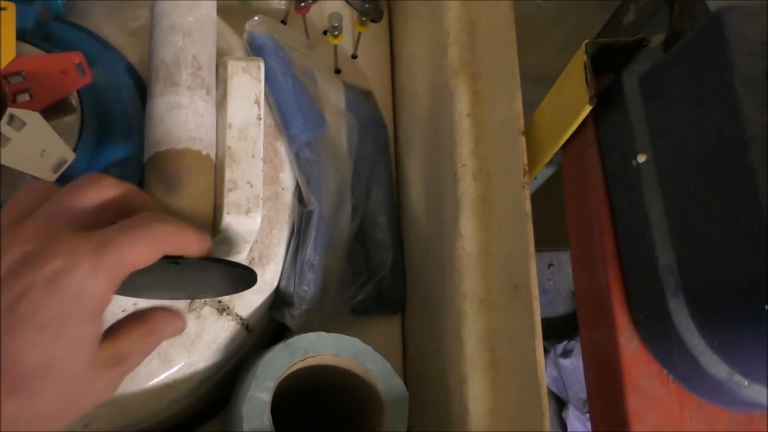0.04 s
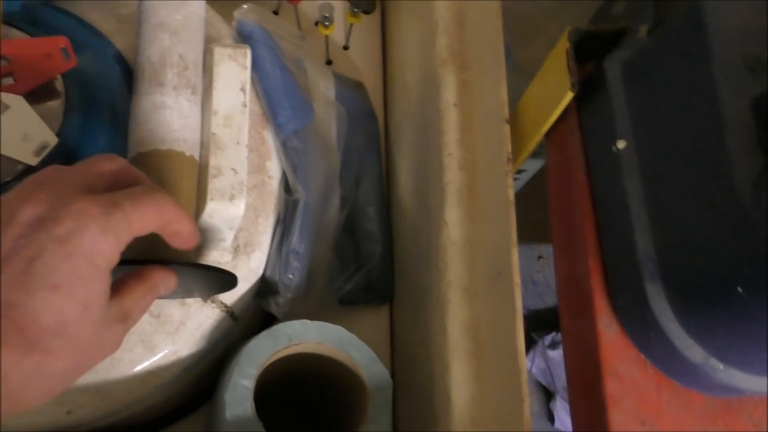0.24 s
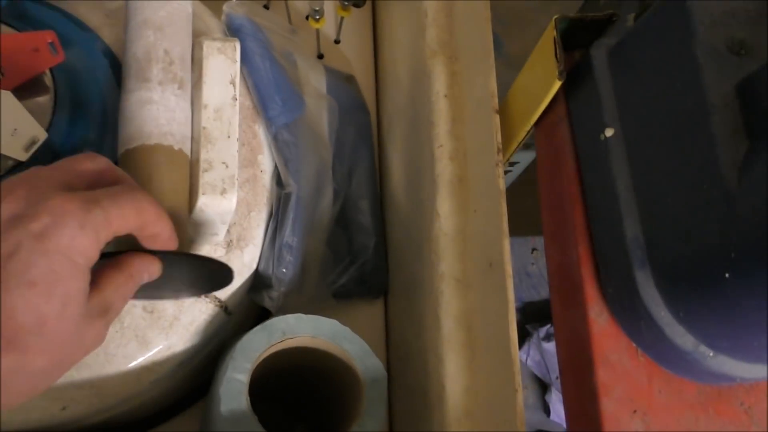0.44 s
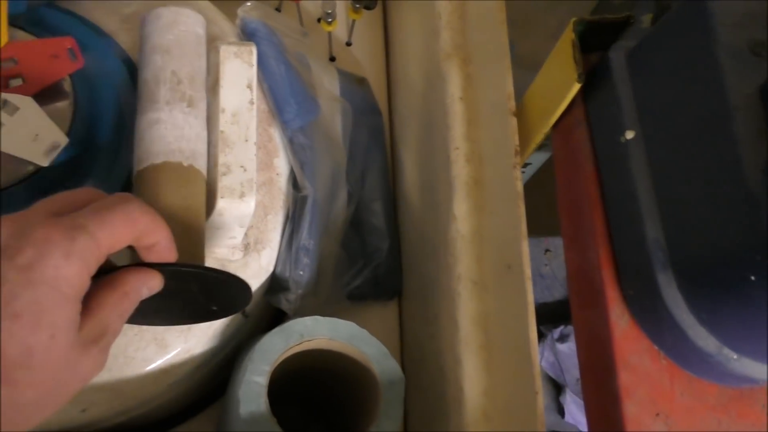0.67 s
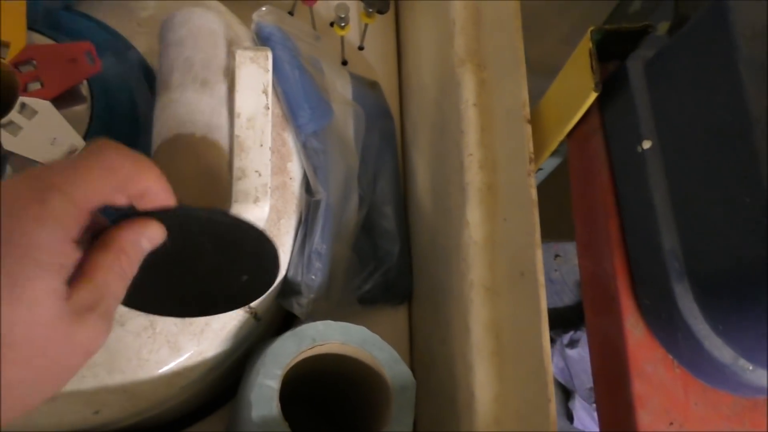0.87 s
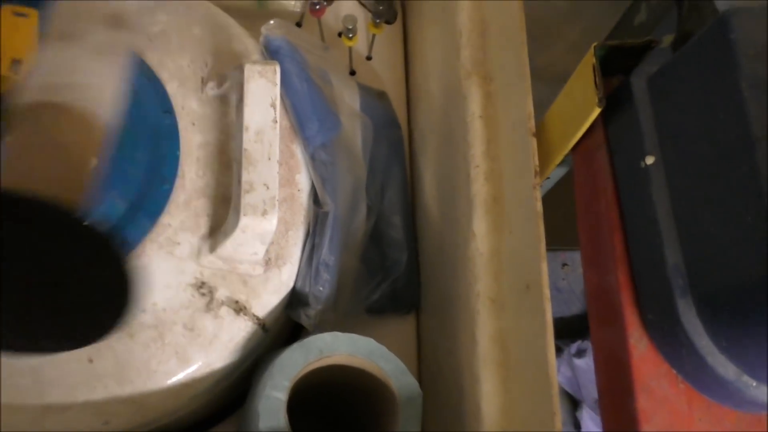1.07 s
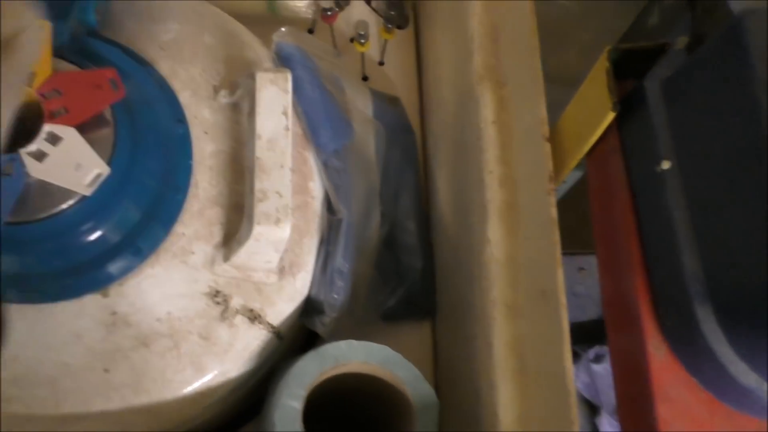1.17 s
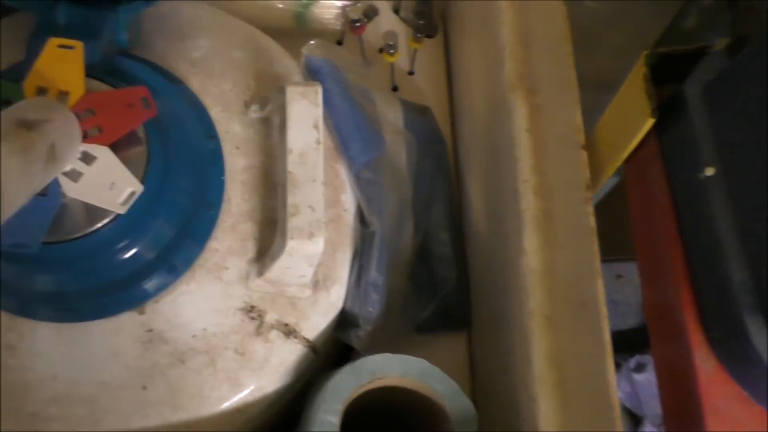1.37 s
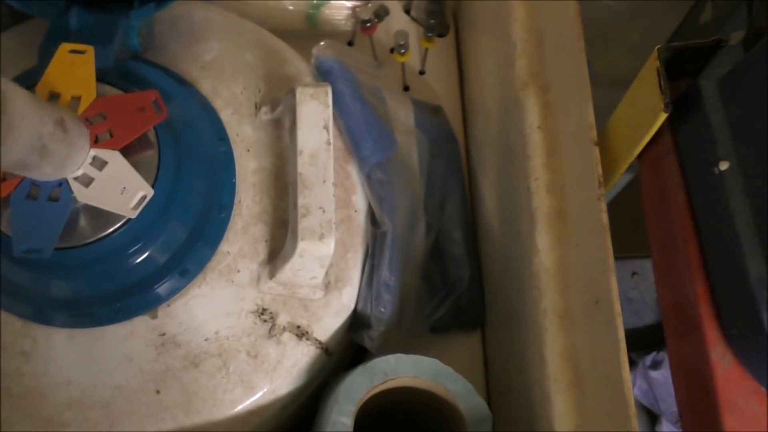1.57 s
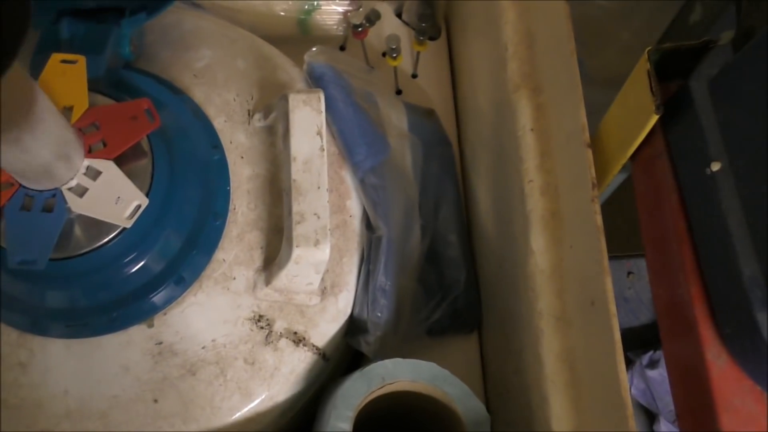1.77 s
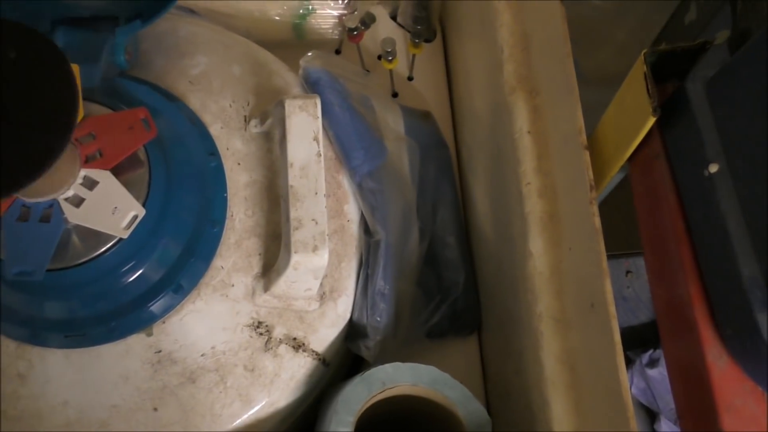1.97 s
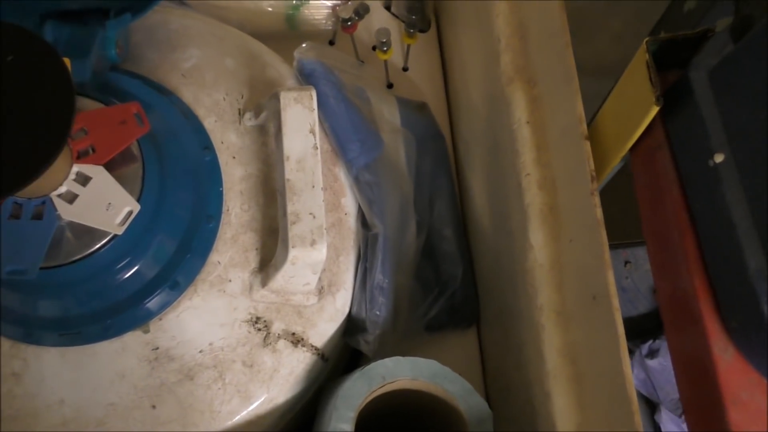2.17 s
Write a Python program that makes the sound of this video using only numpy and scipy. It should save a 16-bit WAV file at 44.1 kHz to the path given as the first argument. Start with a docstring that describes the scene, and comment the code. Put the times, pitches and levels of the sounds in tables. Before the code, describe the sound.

Close to the microphone in a small shed, a plug ticks and skims over a metal flask, clatters against it, pauses, bumps into the neck and grinds down in rough strokes, ending with a loud, squeaky rub.

```python
"""A plug is handled on top of a metal flask in a shed, close to the microphone.
It clicks, slides and knocks on the flask, bumps into the neck, then goes down in three rubbing strokes.
Contacts are struck decaying modes and noise bursts; rubbing is random grains through resonant filters.
The last stroke is loudest and nearly squeaks. Near reflections, a shed tail and quiet air surround it."""
import sys
import numpy as np
from scipy import signal
from scipy.fft import rfft, irfft
from scipy.io import wavfile

SR = 44100
rng = np.random.default_rng(int(sys.argv[2]) if len(sys.argv) > 2 else 0)


def master(y):
    """Save y as 16-bit WAV."""
    cut = np.clip(np.atleast_2d(y).T, -1, 1)
    pcm = np.round(cut * 32767)  # scale
    wavfile.write(sys.argv[1], SR, pcm.astype(np.int16))


N = 97725  # samples

# bright tick of a hard contact [pitch_hz, level_db]
TICK = [(800, -36), (3000, 10), (6000, -9), (9000, 7.5), (13000, -3), (16000, -9)]
# dry rasp of plug on metal [pitch_hz, level_db]
RASP = [(150, -9), (700, -10.5), (1600, -0.5), (2300, 0), (3500, -10.5), (5000, -18), (16000, -35)]
# airy top of the rubbing [pitch_hz, level_db]
HISS = [(500, -30), (2500, -15), (5000, -1), (7200, -2), (9800, 0), (13000, -2.5), (16000, -5.5)]
# resonances on that hiss [pitch_hz, width_hz, above_db]
HISS_PEAKS = [(5380, 43, 1.2), (9500, 290, 2.5)]
STRIKE_S, TICK_T60 = 0.0011, 0.026  # rise of a contact; decay of its tick (s)


def amp(db):
    """Decibels to gain."""
    return 10 ** (np.asarray(db) / 20)


def unit(x):
    """Scales to rms 1."""
    return x / np.sqrt(np.mean(x ** 2) + 1e-20)


def read(points, hz):
    """Reads a table on a log-frequency axis."""
    f, value = np.transpose(points)
    return np.interp(np.log(hz + 1), np.log(f), value)


def levels(curves, column):
    """Summed gain over time from one dB column of each movement, -120 dB outside it."""
    t = np.arange(N) / SR
    total = np.zeros(N)
    for curve in curves:
        points = np.array(curve)
        total += amp(np.interp(t, points[:, 0], points[:, column], left=-120, right=-120))
    return total


def since(start):
    """Seconds since a moment, zero before it."""
    return np.maximum(np.arange(N) / SR - start, 0)


def hump(start, length):
    """Half-sine swell and fall."""
    return np.sin(np.pi * np.minimum(since(start) / length, 1))


def colour(x, shape, peaks=(), size=8192):
    """Causal filter of unit energy: a broad shape with resonances on it."""
    hz = np.fft.rfftfreq(size, 1 / SR)
    power = 1 + sum((amp(db) ** 2 - 1) / (1 + (2 * (hz - f) / w) ** 2) for f, w, db in peaks)
    log_gain = np.log(amp(read(shape, hz))) + np.log(np.maximum(power, 1e-2)) / 2
    # folding the cepstrum gives minimum phase
    cepstrum = irfft(log_gain)
    cepstrum[1:size // 2] *= 2
    cepstrum[size // 2 + 1:] = 0
    taps = irfft(np.exp(rfft(cepstrum)))
    return signal.fftconvolve(x, taps / np.linalg.norm(taps))[:N]


def tilt(x, points):
    """Applies a gain curve over frequency."""
    gain = amp(read(points, np.fft.rfftfreq(2 * N, 1 / SR)))
    return irfft(rfft(x, 2 * N) * gain)[:N]


def wander(seconds):
    """Smooth chance of rms 1."""
    window = np.hanning(int(2 * seconds * SR) + 3)
    return unit(signal.fftconvolve(rng.standard_normal(N), window, "same"))


def friction(spread_db, clump_db, per_s=7000):
    """Tiny slips of uneven size that come in clumps."""
    size = amp(spread_db * np.minimum(rng.exponential(1, N), 4))
    slips = rng.choice([-1, 1], N) * (rng.random(N) < per_s / SR)
    return unit(size * slips * amp(clump_db * wander(0.0033)))


def burst(start, db, rise, t60):
    """Envelope of one contact: linear rise on an exponential decay."""
    t = since(start)
    return np.minimum(t / rise, 1) * amp(db) * np.exp(-np.log(1000) * t / t60)


def ring(start, db, modes):
    """Decaying modes struck at one moment."""
    t = since(start)
    norm = np.sqrt(sum(amp(m[1]) ** 2 for m in modes) / 2)
    out = np.zeros(N)
    for k, (f, mode_db, t60) in enumerate(modes):
        sign = (-1) ** k
        out += sign * burst(start, db + mode_db, STRIKE_S, t60) * np.sin(2 * np.pi * f * t)
    return out / norm


def air():
    """Quiet background of the shed: wide coloured noise with a slightly fluttering level."""
    # background colour [pitch_hz, level_db]
    air_tone = [(25, -1), (60, 2), (120, 4), (270, 9.5), (380, 5.5), (550, -2), (750, -2), (1100, 2.5),
                (1600, 3), (3000, -3.5), (5000, -13), (7800, -16), (9600, -12.5), (16000, -14)]
    # difference between the two sides [pitch_hz, side_db]
    air_side = [(30, -3), (150, -1.5), (500, -10), (2000, -3), (16000, -9)]
    # slow drift of the background [time_s, level_db]
    air_level = [(0, -56.5), (.16, -58), (.42, -59), (.95, -58.5), (1.18, -55.5), (1.31, -59.5), (2.2, -53)]
    mid, side = (colour(rng.standard_normal(N), air_tone) for _ in range(2))
    side = tilt(side, air_side)
    drift_db = np.interp(np.arange(N) / SR, *np.transpose(air_level))
    return np.array([mid + side, mid - side]) * amp(drift_db + 0.8 * wander(0.051))


def clicks(grit_db=-6, t60=0.046):
    """Glancing contacts strike the rim's modes, with a little scratch and treble noise."""
    # clicks on the rim [start_s, level_db, treble_db]
    rim_clicks = [(.183, -35.5, -47), (0.288, -35, -62), (0.465, -56, -68), (0.833, -41.5, -43),
                  (1.349, -55.5, -85)]
    # modes of the rim [pitch_hz, level_db, t60_s]
    rim = [(1010, 4, 0.025), (1384, 11, 0.031), (1437, 3.5, 0.15), (2100, 3, 0.045), (3025, 3, 0.034),
           (3320, -16, .05), (4020, -6, 0.04), (4570, -17, 0.027)]
    # colour of the scratch [pitch_hz, level_db]
    rim_grit = [(600, -17), (950, -5), (1600, -4), (3000, -1), (5500, -10.5), (9000, -27), (16000, -32)]
    rings = sum(ring(s, db, rim) for s, db, _ in rim_clicks)
    grit = sum(burst(s, db + grit_db, STRIKE_S, t60) for s, db, _ in rim_clicks)
    treble = sum(burst(s, db, STRIKE_S, TICK_T60) for s, _, db in rim_clicks)
    a, b = rng.standard_normal((2, N))
    return rings + colour(grit * a, rim_grit) + colour(treble * b, TICK)


def skim():
    """The friction of a light touch, with barely any clumping."""
    return friction(spread_db=2.5, clump_db=-0.1)


def slides():
    """The plug skims the flask top: light friction coloured as rasp and hiss."""
    # light slides, before the trims below [time_s, rasp_db, hiss_db]
    light_slides = [
        [(0.205, -56, -75), (0.219, -48.5, -54.5), (0.279, -44, -54), (0.307, -36.5, -46), (0.345, -54, -79)],
        [(0.466, -59.5, -77), (0.487, -48.5, -56.5), (0.547, -49, -58.5), (0.569, -46.5, -68),
         (0.645, -63, -60)],
        [(0.77, -53, -63), (0.78, -60, -78), (0.838, -49, -69), (0.852, -57, -84), (0.885, -71, -72)],
    ]
    # resonances of the rasp [pitch_hz, width_hz, above_db]
    rasp_peaks = [(1570, 80, 3), (2160, 31, 1.5), (3510, 130, 6)]
    rasp = colour(skim() * levels(light_slides, 1), RASP, rasp_peaks)
    hiss = colour(skim() * levels(light_slides, 2), HISS, HISS_PEAKS)
    return amp(-3) * rasp + amp(-2.5) * hiss


def snags(rise_s=0.0018, t60=0.026):
    """Bright noise crunches as grit catches and lets go."""
    # sharp snags of grit [start_s, level_db]
    grit_snags = [(.220, -59), (1.393, -31), (1.414, -43), (1.458, -47), (1.479, -42), (1.698, -46),
                  (1.77, -40.5), (1.788, -32), (1.898, -32), (1.95, -21.5), (1.970, -46), (2.129, -38.5)]
    crunch = sum(burst(s, db, rise_s, t60) for s, db in grit_snags)
    return colour(crunch * rng.standard_normal(N), HISS, HISS_PEAKS)


def knocks():
    """The plug taps the flask: wall, hollow, a ping and the body ring under a short clatter and a tick."""
    # knocks on the flask [start_s, wall_db, hollow_db, ping_db, clatter_db, tick_db]
    flask_knocks = [(.290, -41, -48, -39, -32, -48), (0.302, -67, -53, -50, -34, -40.5),
                    (0.5701, -38, -43, -47, -34.5, -52), (.582, -41.5, -61, -50, -44, -56),
                    (.616, -70, -38.5, -49, -38, -50), (.638, -44.5, -48.5, -51, -50, -43.5),
                    (.653, -31.5, -39, -30, -29.5, -35.5), (0.666, -58, -60, -59, -42, -68)]
    # modes of the flask wall [pitch_hz, level_db, t60_s]
    wall = [(608, -13, .28), (678, -6, .17), (754, -9, .21), (985, -11, .12), (1093, -2, .17),
            (1135, -9, .33), (1168, -12, .55), (1272, -13, .42), (1480, -12, .12), (1625, -9, .08),
            (2234, -17, .11), (2385, -17, .13)]
    # modes of the hollow inside [pitch_hz, level_db, t60_s]
    hollow = [(190, -12, .3), (236, -11, .15), (269, 0, .62), (326, 0, .14), (352, -1, .12), (501, -14, .3)]
    # ping, most when the plug lands squarely [pitch_hz, level_db, t60_s]
    ping = [(1246, 6, 0.1), (1641, -17, 0.11)]
    # colour of the clatter [pitch_hz, level_db]
    clatter_tone = [(30, -42), (100, -28), (260, 4), (550, -8), (1000, 5), (1600, 1.5), (3000, -13.5),
                    (5000, -26), (16000, -28)]
    # dense, rough after-ring of the flask body [pitch_hz, level_db]
    body_tone = [(80, -12), (170, -3.5), (320, 3.5), (520, -10), (720, 0), (1150, -9), (1500, -19),
                 (2500, -20), (5000, -35.5)]
    # resonances of the tick [pitch_hz, width_hz, above_db]
    tick_peaks = [(8450, 200, 9), (9100, 210, 1), (10700, 180, -2)]
    rings, clatter, body, ticks = np.zeros((4, N))
    for s, wall_db, hollow_db, ping_db, clatter_db, tick_db in flask_knocks:
        rings += ring(s, wall_db, wall) + ring(s, hollow_db, hollow) + ring(s, ping_db, ping)
        clatter += burst(s, clatter_db, STRIKE_S, t60=0.057)
        body += burst(s, clatter_db - 8.5, rise=0.018, t60=0.25)
        ticks += burst(s, tick_db, rise=0.0007, t60=TICK_T60)
    a, b, c = rng.standard_normal((3, N))
    noise = colour(clatter * a, clatter_tone) + colour(body * b, body_tone)
    return rings + noise + colour(ticks * c, TICK, tick_peaks)


def bumps():
    """Dull, damped modes and a noise crunch as the plug meets the flask and its neck."""
    # bumps on the flask and in its neck [start_s, thud_db, crunch_db]
    plug_bumps = [(0.293, -38.5, -57), (1.348, -47, -48), (1.393, -26, -30.5), (1.529, -35.5, -37),
                  (1.784, -40, -55), (1.950, -38, -32.5), (1.998, -51, -39)]
    # modes of the thud [pitch_hz, level_db, t60_s]
    thud = [(186, -13.5, 0.074), (258, -6.5, 0.068), (310, -4.5, 0.053), (554, -8, 0.012),
            (886, -19.5, 0.12)]
    thuds = sum(ring(s, db, thud) for s, db, _ in plug_bumps)
    crunch = sum(burst(s, db, rise=0.0011, t60=0.042) for s, _, db in plug_bumps)
    return thuds + colour(crunch * rng.standard_normal(N), RASP, [(1673, 61, 8.3)])


def drags():
    """Rough dragging makes the hollow and the wall hum: light friction through their resonances."""
    # the plug drags across the flask wall [start_s, length_s, level_db]
    wall_drags = [(0.591, 0.057, -38)]
    # colour of the drag [pitch_hz, level_db]
    drag_tone = [(100, -15), (200, 5), (330, 12), (550, -29), (720, -13), (1200, 6.5), (1600, -9),
                 (2000, -17), (2350, 0), (3200, -24), (6000, -51)]
    # resonance of the drag [pitch_hz, width_hz, above_db]
    drag_peaks = [(260.4, 13, 7.5)]
    press = sum(amp(db) * hump(start, length) for start, length, db in wall_drags)
    return colour(skim() * press, drag_tone, drag_peaks)


def judders():
    """Brief squeaks and hums of the rubbing plug: sines of unsteady pitch that swell and fade."""
    # squeaks and hums [start_s, length_s, pitch_hz, level_db]
    squeaks = [(0.952, 0.016, 805, -59), (1.351, 0.007, 2530, -51), (1.357, 0.012, 293, -44),
               (1.429, 0.12, 1673, -43), (1.52, 0.021, 893, -41), (1.614, 0.042, 1030, -51.5),
               (1.854, 0.011, 3025, -25), (1.859, 0.009, 2980, -26), (1.87, 0.0095, 3038, -21.5),
               (1.882, 0.018, 1683, -24), (1.905, 0.1, 184, -37), (1.993, 0.014, 1400, -30.5),
               (2.131, 0.097, 183.7, -42)]
    out = np.zeros(N)
    for start, length, hz, db in squeaks:
        pitch = hz * (1 + 0.023 * wander(0.00199))
        turns = np.cumsum(pitch) / SR
        out += amp(db) * hump(start, length) * np.sqrt(2) * np.sin(2 * np.pi * turns)
    return out


def sway(x):
    """The resonances waver as the plug rocks in the neck: a slow random shift in time."""
    t = np.arange(N) / SR
    return np.interp(t + 0.00005 * wander(0.01), t, x)  # shift of 0.05 ms rms


def rub(moves, colours):
    """Friction in the neck drives the hollow, the neck ring and a squeak; sparser grit crackles above."""
    slips = friction(spread_db=2, clump_db=2)
    grit = friction(spread_db=4, clump_db=2, per_s=2200)
    trims_db = [-2, -1.5, -1, -1]  # hollow, neck, squeak, hiss
    layers = []
    for k, drive in enumerate([slips, slips, slips, grit]):
        # random signs make the layers independent;
        # hollow, neck and squeak share grain times, hiss has its own
        grains = drive * rng.choice([-1, 1], N) * levels(moves, k + 1)
        layers.append(amp(trims_db[k]) * colour(grains, *colours[k]))
    boom, neck, squeak, hiss = layers
    return boom + sway(neck + squeak) + hiss


def strokes():
    """Two strokes in the mouth of the neck, then the deep push, each place with its own resonances."""
    # first stroke, before the trims in rub [time_s, hollow_db, neck_db, squeak_db, hiss_db]
    first = [(1.405, -52, -62, -63, -58), (1.409, -45, -50, -61, -81), (1.417, -40, -42.5, -45, -47),
             (1.437, -46, -47.5, -50, -47.5), (1.463, -43, -48, -48.5, -36.5),
             (1.471, -42.5, -44, -46, -50), (1.483, -38, -45, -50, -38.5), (1.495, -46.5, -57, -51, -47),
             (1.505, -39, -36.5, -53, -42), (1.525, -41, -47, -40.5, -38), (1.543, -40, -50, -60.5, -60.5),
             (1.605, -55.5, -62, -66, -77)]
    # second stroke, same columns [time_s, hollow_db, neck_db, squeak_db, hiss_db]
    second = [(1.61, -60, -72, -79, -78), (1.616, -51, -53, -57, -83), (1.632, -40, -32, -44.5, -46.5),
              (1.67, -50.5, -59, -63, -85), (1.73, -51, -53, -63, -64), (1.769, -42.5, -42, -52.5, -58)]
    # deep push, same columns [time_s, hollow_db, neck_db, squeak_db, hiss_db]
    push = [(1.768, -50, -39, -49, -54), (1.774, -60, -33, -45, -40), (1.782, -61, -40, -43, -43),
            (1.79, -38, -27, -37, -32.5), (1.802, -39.5, -36, -34, -39.5), (1.828, -37, -32.5, -36, -40.5),
            (1.866, -35.5, -26.5, -25, -37), (1.883, -35, -29, -31.5, -43), (1.898, -48.5, -26, -30, -38),
            (1.92, -37, -31.5, -43, -47), (1.94, -32, -36.5, -38, -42), (1.954, -45, -25, -28.5, -31),
            (1.966, -35, -28, -43, -38.5), (2.044, -39, -37, -41.5, -45), (2.052, -40, -31, -41, -44.5),
            (2.072, -41.5, -45, -48, -51.5), (2.116, -47.5, -40, -48, -46.5),
            (2.146, -40.5, -48.5, -52, -59), (2.18, -49, -43.5, -54, -54), (2.215, -41.5, -51, -52, -57.5)]
    # hollow with the plug in the mouth [pitch_hz, level_db]
    mouth_boom = [(30, -24), (110, -14), (190, 6), (250, 4.5), (310, -4), (370, -5), (490, -4), (680, -17),
                  (1000, -12.5), (2000, -32)]
    # neck ring in the mouth [pitch_hz, level_db]
    mouth_neck = [(400, -32), (900, 0.5), (1150, -4), (1550, -0.5), (1800, -1.5), (2300, -15), (2800, -34),
                  (6000, -19.5)]
    # its resonances [pitch_hz, width_hz, above_db]
    mouth_neck_peaks = [(1475, 20, 12), (1644, 29, 18.4), (1670, 32, 7.3), (2150, 66, 14)]
    # squeak resonances in the mouth [pitch_hz, width_hz, above_db]
    mouth_squeak_peaks = [(2964, 89, 17), (3230, 37, 6.3), (3950, 38, 4.3)]
    # hiss resonances in the mouth [pitch_hz, width_hz, above_db]
    mouth_hiss_peaks = [(4860, 62, 6.4), (9640, 570, 8.6), (11600, 910, 7.1), (13400, 500, 8.5)]
    # hollow with the plug deep [pitch_hz, level_db]
    deep_boom = [(30, -34), (100, -12.5), (170, 4), (260, -3), (370, -4), (580, -18.5), (1000, -18),
                 (2000, -45)]
    # its resonances [pitch_hz, width_hz, above_db]
    deep_boom_peaks = [(210, 15, 5.9), (237.5, 9.8, 5.4)]
    # neck ring when deep [pitch_hz, level_db]
    deep_neck = [(300, -31), (800, -12), (1150, -8), (1500, -1.5), (1800, -5.5), (2300, -18.5), (2800, -11),
                 (6000, -39)]
    # its resonances [pitch_hz, width_hz, above_db]
    deep_neck_peaks = [(1273, 38, 8.6), (1475, 20, 4.7), (1454, 22, 7.7), (1653, 21.4, 17.1),
                       (1766, 12, 18), (2030, 13, 7), (2180, 130, 12.8)]
    # squeak in both places [pitch_hz, level_db]
    squeak_tone = [(1000, -30), (2200, 3.5), (2800, -11), (3500, -3.5), (4200, -1.5), (5200, -9),
                   (8000, -20)]
    # squeak resonances when deep [pitch_hz, width_hz, above_db]
    deep_squeak_peaks = [(2980, 38, 18.6), (3057, 36, 18.6), (3956, 53, 7.3), (4070, 35, 10.6)]
    mouth = [(mouth_boom,), (mouth_neck, mouth_neck_peaks),
             (squeak_tone, mouth_squeak_peaks), (HISS, mouth_hiss_peaks)]
    deep = [(deep_boom, deep_boom_peaks), (deep_neck, deep_neck_peaks),
            (squeak_tone, deep_squeak_peaks), (HISS, HISS_PEAKS)]
    return rub((first, second), mouth) + rub((push,), deep)


def catches():
    """The plug catches and lets go, and the neck's modes ring briefly."""
    # catches in the neck [start_s, level_db]
    neck_catches = [(1.699, -42.5), (1.787, -22), (1.951, -26.5), (1.969, -35), (1.996, -31)]
    # modes of the neck [pitch_hz, level_db, t60_s]
    neck_modes = [(1622, 1, .04), (3110, -5.5, 0.032), (4084, 2.5, 0.034)]
    return sum(ring(s, db, neck_modes) for s, db in neck_catches)


def near(x):
    """Dense early reflections from the flask top and things beside it: decaying noise from 0.49 ms on."""
    taps = burst(0.00049, 0, STRIKE_S, t60=0.037) * rng.standard_normal(N)
    return signal.fftconvolve(x, taps / np.linalg.norm(taps))[:N]


def shed(x):
    """A short diffuse tail, each band dying at its own speed."""
    # decay of the shed [pitch_hz, t60_s]
    shed_t60 = [(100, 0.094), (400, 0.047), (1500, 0.34), (5000, 0.094), (16000, 0.043)]
    hz, t, z = signal.stft(rng.standard_normal(SR // 2), SR, nperseg=256)
    decay = np.exp(-np.log(1000) * t / read(shed_t60, hz)[:, None])
    onset = np.minimum(t / 0.0033, 1)
    tail = signal.istft(z * decay * onset, SR, nperseg=256)[1]
    return signal.fftconvolve(x, tail / np.linalg.norm(tail))[:N]


def scene():
    """The flask a little to the left, with near reflections and the shed around it."""
    # gentle bass cut on knocks and clicks [pitch_hz, level_db]
    bass_cut = [(40, -10), (200, 0)]
    # how much louder the left side is [pitch_hz, level_db]
    left_louder = [(100, -1), (250, 2.5), (700, -2), (1150, -1.2), (1650, 1.5), (3300, 5), (6000, 0),
                   (16000, 1.2)]
    # how far the left side leads in phase [pitch_hz, lead_rad]
    left_leads = [(250, 0.079), (800, 0.22), (1700, 0.42), (3200, 0.22), (6000, -0.79), (16000, -0.47)]
    # near reflections in the middle, before their trim [pitch_hz, level_db]
    near_tone = [(200, -5.5), (1500, 6.5), (3500, 5), (16000, 10)]
    # near reflections that differ between the sides [pitch_hz, level_db]
    side_tone = [(60, -23), (200, -40), (500, -18), (1500, -14.5), (3000, -6.5), (8000, -25.5), (16000, -5)]
    taps = tilt(knocks() + clicks(), bass_cut)
    dry = taps + drags() + slides() + bumps() + snags() + catches() + strokes() + judders()
    hz = np.fft.rfftfreq(2 * N, 1 / SR)
    # half the difference goes to each side
    lean = amp(read(left_louder, hz) / 2) * np.exp(1j * read(left_leads, hz) / 2)
    mid = dry + amp(-13.5) * tilt(near(dry), near_tone)
    direct = irfft(rfft(mid, 2 * N) * np.array([lean, 1 / lean]))[:, :N]
    # a second, independent draw of the rubbing, opposite in the two sides, widens it
    wide_rub = amp(-25.5) * (strokes() + slides())
    side = tilt(near(dry), side_tone) + wide_rub
    room = amp(-17.5) * np.array([shed(dry), shed(dry)])
    return direct + np.array([side, -side]) + room + air()


def record(dry):
    """The recorder's band limit: a steep low-pass at 16 kHz."""
    taps = signal.firwin(511, 16000, window=("kaiser", 9), fs=SR)
    return signal.oaconvolve(dry, taps[None], "same")


dry = scene()
out = record(dry)
master(out)
```